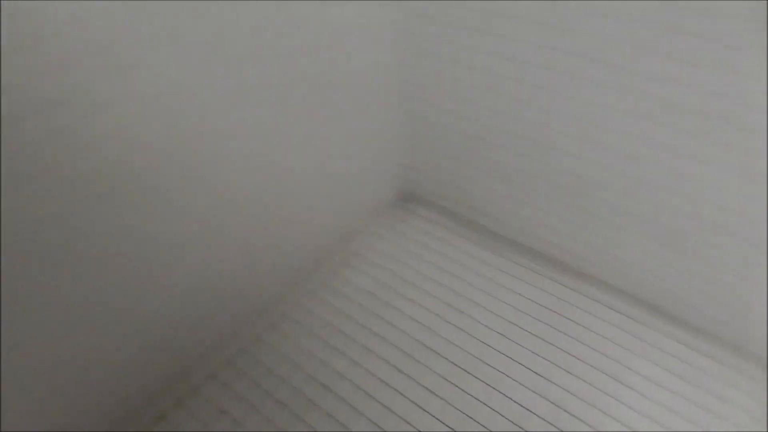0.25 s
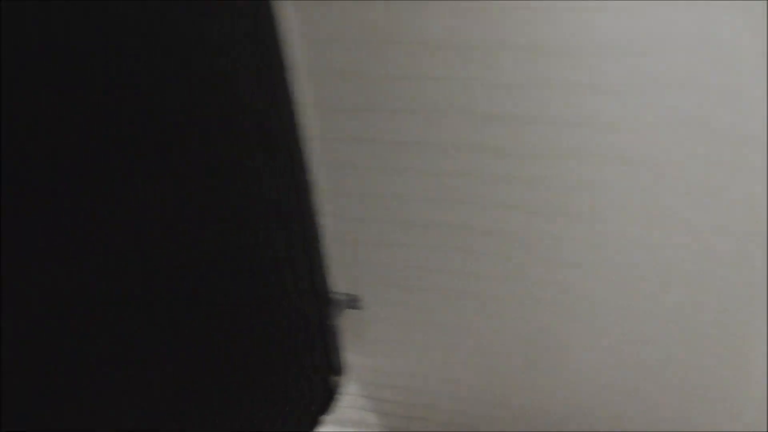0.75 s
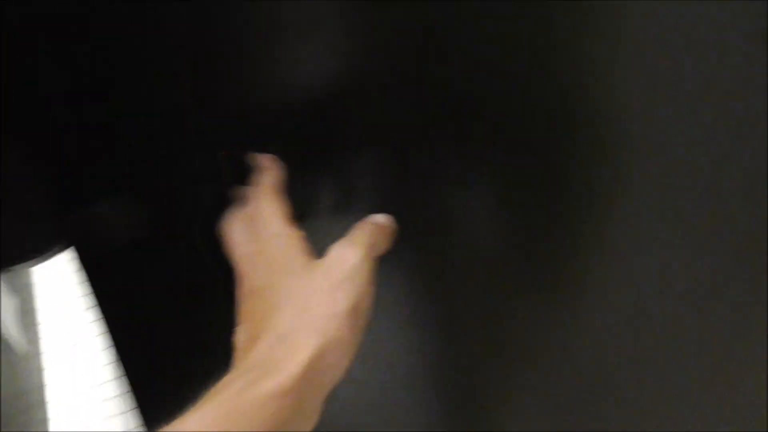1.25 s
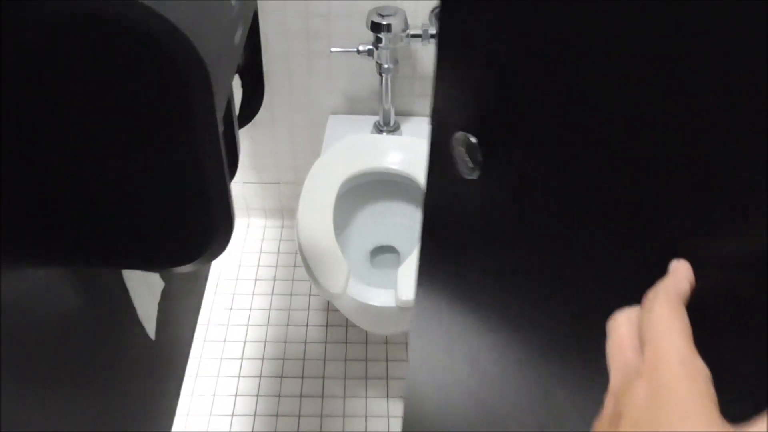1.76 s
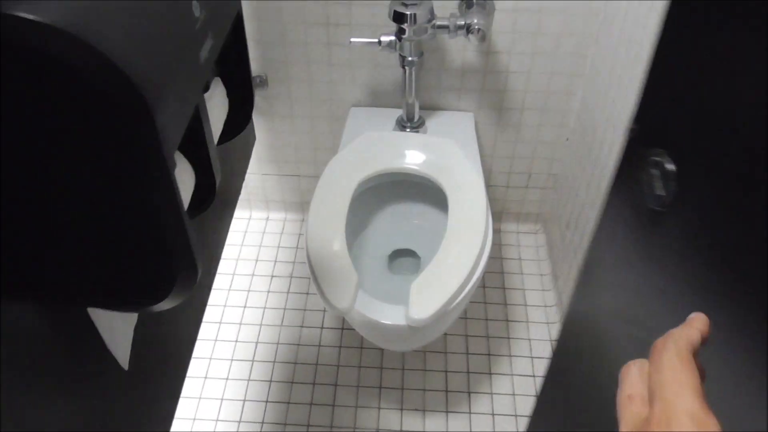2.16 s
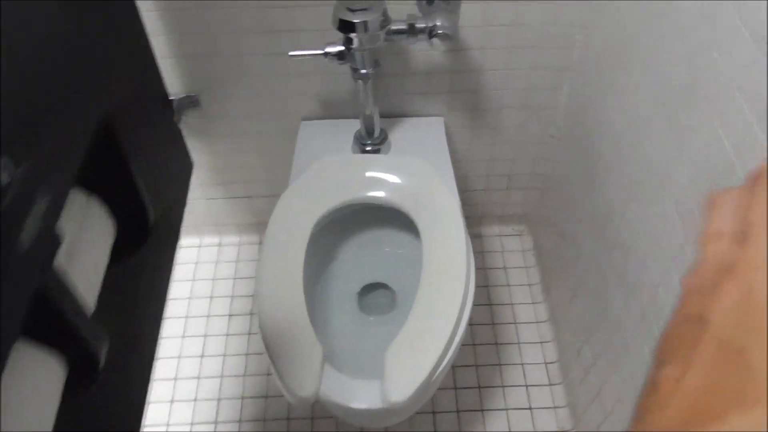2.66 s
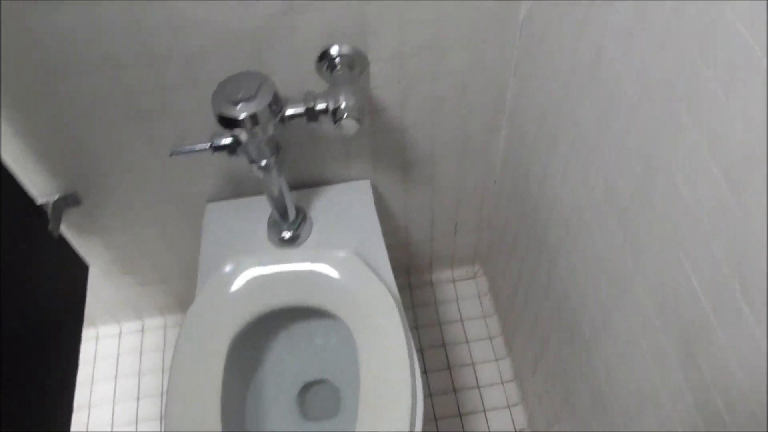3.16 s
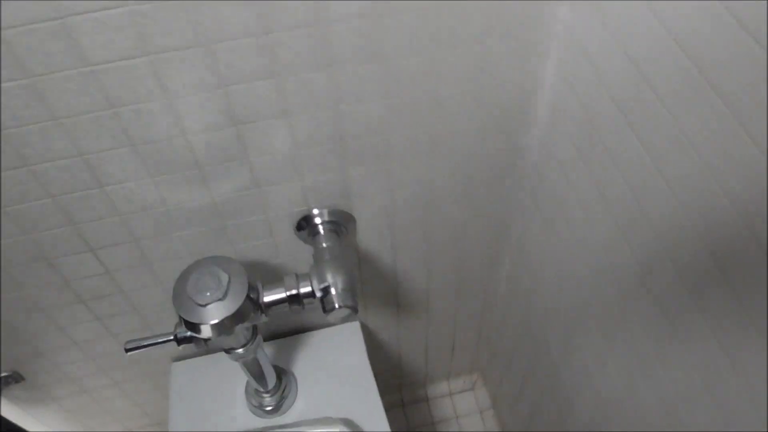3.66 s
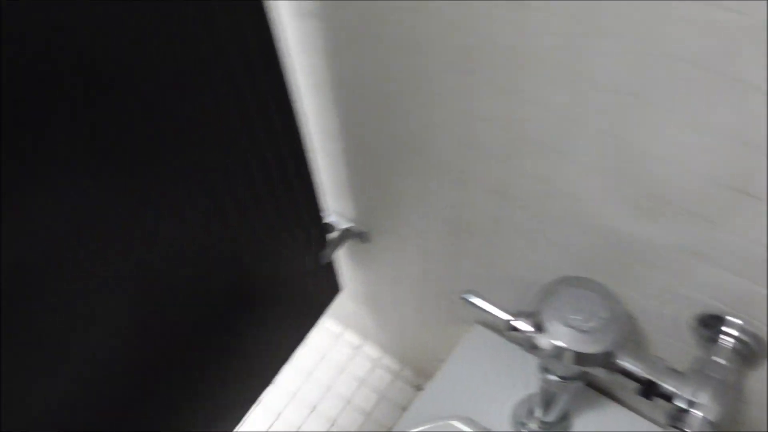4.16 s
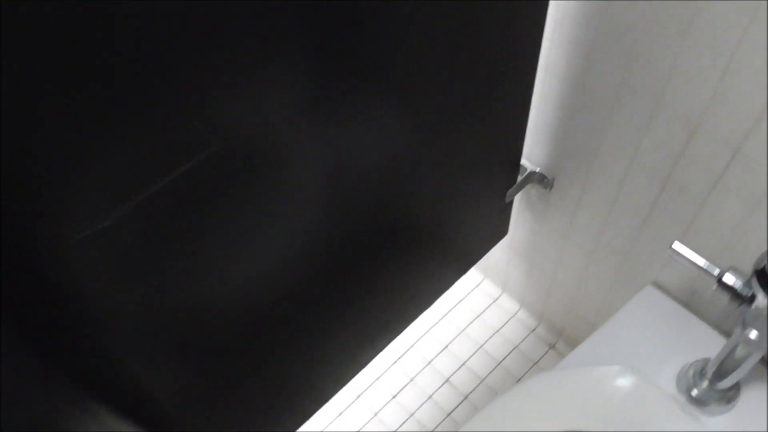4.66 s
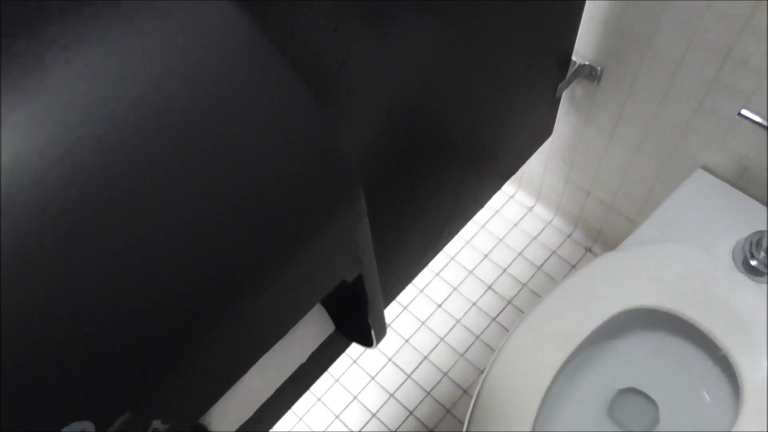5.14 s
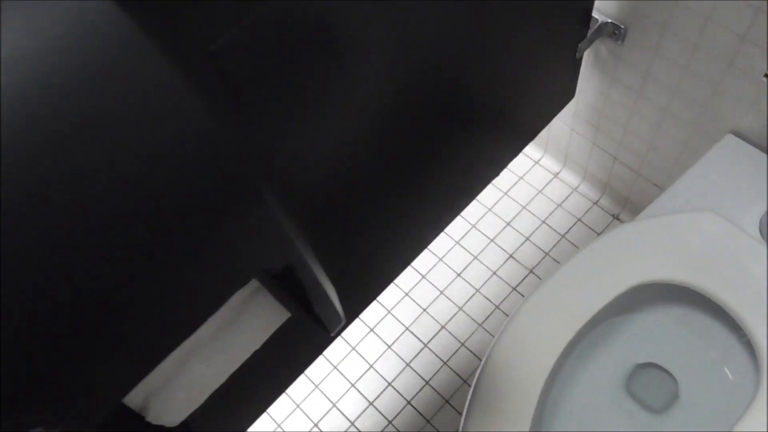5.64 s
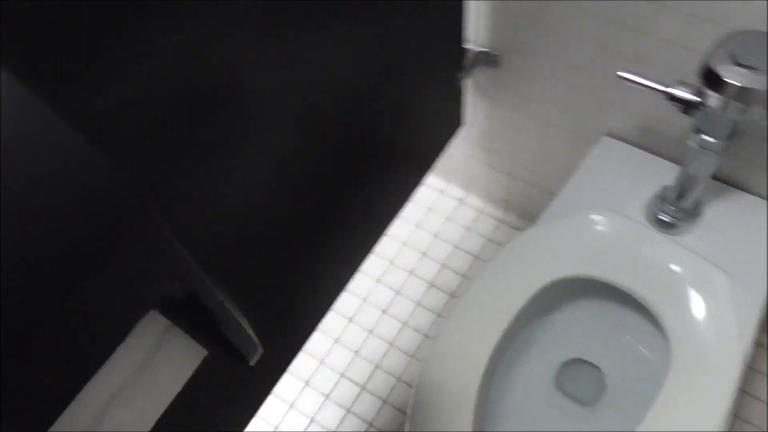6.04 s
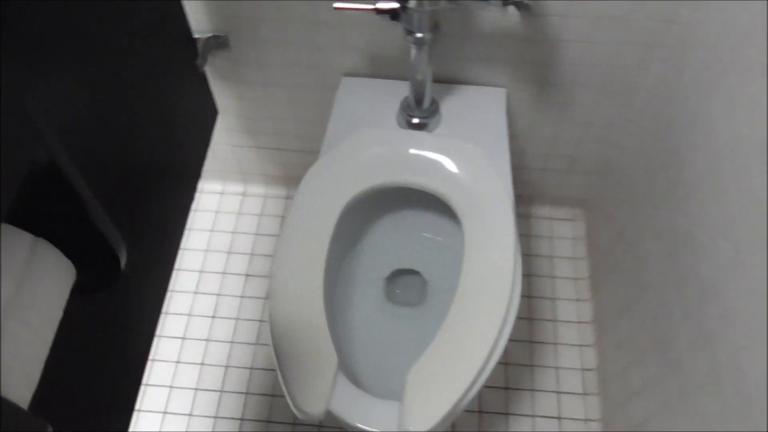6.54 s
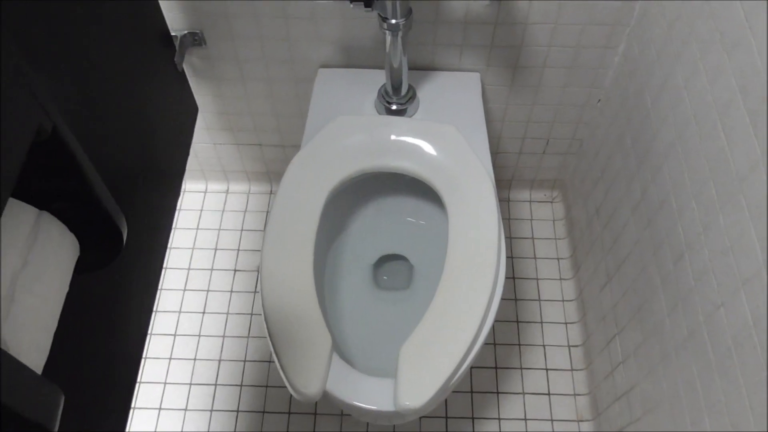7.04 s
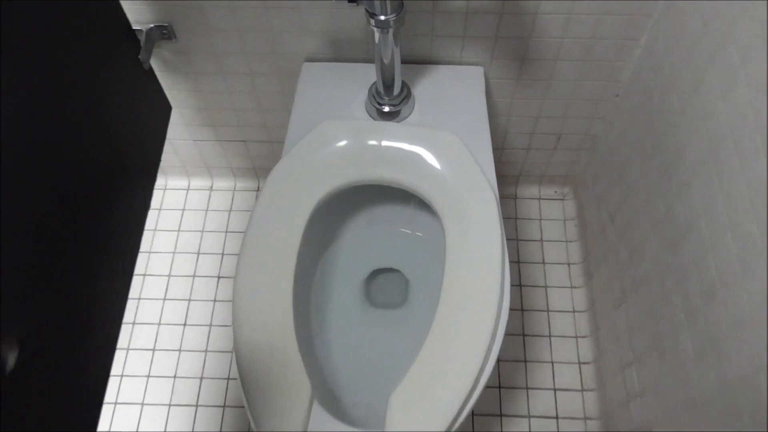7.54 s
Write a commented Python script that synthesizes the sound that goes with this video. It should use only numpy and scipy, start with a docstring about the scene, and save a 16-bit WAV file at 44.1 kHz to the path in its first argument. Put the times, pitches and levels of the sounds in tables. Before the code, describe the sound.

In a tiled restroom, shoes scuff, a stall door bangs with a ringing latch, and heavy knocks shake the partition while ventilation hums.

```python
"""A small tiled restroom stall. Someone walks in: footsteps, a hand on the door, the door banging on
the partition, knocks on hard fittings. Each blow is four bands of decaying noise plus a hollow ring.
One bang rings the metal latch; two heavy blows set the partition booming. Shoes scuff and cloth rustles
over a low ventilation hum and a faint hiss. The tiles reflect the blows and the latch."""
import sys
import numpy as np
from scipy import signal
from scipy.fft import rfft, irfft
from scipy.io import wavfile
from scipy.ndimage import uniform_filter1d

SR = 44100
rng = np.random.default_rng(int(sys.argv[2]) if len(sys.argv) > 2 else 0)


def generate_wav(signal):
    """Clip the signal to [-1, 1] and save it as 16-bit WAV at the path in sys.argv[1]."""
    frames = np.transpose(np.atleast_2d(signal))
    scaled = np.clip(frames, -1, 1) * 32767
    pcm = np.round(scaled).astype(np.int16)
    wavfile.write(sys.argv[1], SR, pcm)


N = 343980

# Stereo width. Each row: frequency in Hz, left-right correlation.
COHERENCE = [(60, 0.99), (300, 0.85), (700, 0.65), (1600, 0.42), (12000, 0.35)]
# Resonances of the stall in Hz.
STALL_MODES_HZ = (167.8, 269.2, 307.7, 376, 482.4, 583.4, 729, 857, 1069, 1244)


def gain_of(db):
    return 10 ** (np.asarray(db) / 20)


def unit_rms(x):
    return x / np.sqrt(np.mean(x ** 2) + 1e-20)


def curve_at(points, hz):
    """Interpolate (Hz, value) rows over log frequency."""
    point_hz, value = np.transpose(points)
    return np.interp(np.log(hz + 1), np.log(point_hz + 1), value)


def add(mix, start_s, sound):
    part = mix[:, round(start_s * SR):][:, :sound.shape[1]]
    part += sound[:, :part.shape[1]]


def noise(colour, patchy_db=0, flicker_db=0, size=1024):
    """Unit-RMS stereo noise; optional drifting spectral patches and wide-band flicker."""
    frames, hz = 4 * N // size + 5, np.fft.rfftfreq(size, 1 / SR)
    a, b, c, d, patches = rng.standard_normal((frames, len(hz), 5)).T
    patches = unit_rms(uniform_filter1d(uniform_filter1d(patches, size=50, axis=0), size=12, axis=1))
    flicker = unit_rms(uniform_filter1d(rng.standard_normal(frames), size=3))
    coherence = curve_at(COHERENCE, hz)[:, None]
    left, independent = a + 1j * b, c + 1j * d
    spectra = np.array([left, coherence * left + np.sqrt(1 - coherence ** 2) * independent])
    spectra *= gain_of(curve_at(colour, hz)[:, None] + patchy_db * patches + flicker_db * flicker)
    return unit_rms(signal.istft(spectra, nperseg=size, noverlap=3 * size // 4)[1][:, :N])


def hiss():
    """Faint microphone self-noise."""
    # Each row: frequency in Hz, relative level in dB.
    colour = [(600, -48), (1500, 11), (1900, -32), (6000, -19), (11000, 0), (15800, -9)]
    return gain_of(-69.5) * noise(colour, patchy_db=1.5, flicker_db=0.2)


def ventilation():
    """Air rumbles and the stall resonates with a drone; both levels drift as the listener moves."""
    # Each row: time in seconds, rumble in dB, drone in dB.
    levels = [(0, -48.5, -76), (.4, -52, -56.5), (2.4, -50.5, -59.5), (4.7, -53, -61), (6.8, -51.5, -58.5),
              (7.8, -55.5, -51)]
    # Spectra. Each row: frequency in Hz, relative level in dB.
    rumble_colour = [(25, -22.5), (60, -8.5), (110, -8), (190, -1.5), (260, -4.5), (340, -14), (515, -20),
                     (1200, -41.5)]
    drone_colour = [(120, -21.5), (160, -7.5), (205, -15.5), (258, 1.5), (300, -15), (400, -109)]
    t = np.arange(N) / SR
    times_s, rumble_db, drone_db = np.transpose(levels)
    rumble = gain_of(np.interp(t, times_s, rumble_db)) * noise(rumble_colour, size=4096)
    drone = gain_of(np.interp(t, times_s, drone_db)) * noise(drone_colour, size=4096)
    return rumble + drone


def shoes_and_cloth():
    """Each movement swells, holds and fades, scuffing the floor and rustling the cloth together."""
    # Each row: middle in seconds, hold in seconds, scuff in dB, rustle in dB.
    movements = [(0.038, 0.074, -75, -60.5), (0.628, 0.18, -53, -61.5), (0.84, 0.093, -58.5, -62.5),
                 (1.305, 0.48, -55, -58), (1.937, 0.32, -63, -64), (2.649, .26, -50, -58),
                 (3.078, 0.074, -40, -49), (3.342, 0.34, -56.5, -64.5), (3.753, 0.25, -54, -61),
                 (4.273, 0.12, -54, -59.5), (4.87, 1, -58.5, -65), (5.585, 0.22, -42, -59),
                 (5.959, 0.078, -56.5, -61.5), (6.388, 0.26, -49, -58), (6.7, 0.016, -50.5, -45)]
    # Spectra. Each row: frequency in Hz, relative level in dB.
    scuff_colour = [(250, -24), (400, 1.5), (600, -1), (1400, -11), (1900, -25.5), (3000, -96)]
    rustle_colour = [(1200, -54), (2000, 1), (3000, -5), (4000, -0.5), (6000, -5.5), (9000, 0),
                     (13000, -7.5), (15800, -19)]
    rise_db_per_s, fade_db_per_s = 242, 209
    creases_per_s, crease_s, crease_db = 14, 0.004, 1
    t = np.arange(N) / SR
    scuff_power, rustle_power = gain_of((-63.5, -69.5)) ** 2  # constant fidgeting
    for middle_s, hold_s, scuff_db, rustle_db in movements:
        drop_db = rise_db_per_s * np.maximum(middle_s - hold_s / 2 - t, 0)
        drop_db += fade_db_per_s * np.maximum(t - middle_s - hold_s / 2, 0)
        scuff_power += gain_of(scuff_db - drop_db) ** 2
        rustle_power += gain_of(rustle_db - drop_db) ** 2
    creases = 1. * (rng.random(N) < creases_per_s / SR)
    snaps = signal.lfilter([1], [1, -np.exp(-1 / (crease_s * SR))], creases)
    cloth = (1 + gain_of(crease_db) * snaps) * noise(rustle_colour, patchy_db=1, flicker_db=1)
    scuff = noise(scuff_colour, patchy_db=1, flicker_db=2.26)
    return np.sqrt(scuff_power) * scuff + np.sqrt(rustle_power) * cloth


def tiles(x):
    """Reverb: sparse reflections of random sign plus standing waves, each band at its own decay rate."""
    # Each row: frequency in Hz, T60 in seconds.
    decay = [(150, 0.68), (1000, 0.45), (2500, 0.034), (9000, 0.37), (15000, 0.42)]
    taps = np.zeros((2, SR))
    delays = np.arange(400, SR - 20, 20) + rng.integers(0, 20, (2, (SR - 401) // 20))
    np.put_along_axis(taps, delays, rng.choice([-1., 1.], delays.shape), 1)
    taps[1] = 0.84 * taps[0] + 0.5 * taps[1]
    taps += gain_of(-38) * sum(np.sin(2 * np.pi * hz * np.arange(SR) / SR) for hz in STALL_MODES_HZ)
    hz, t, spectra = signal.stft(taps, SR, nperseg=256)
    spectra *= gain_of(-60 * t / curve_at(decay, hz)[:, None])
    tail = signal.istft(spectra, SR, nperseg=256)[1]
    return signal.fftconvolve(x, tail / np.linalg.norm(tail[0]), axes=1)[:, :N]


def partition():
    """The panel booms on after a heavy blow: quick rise, sagging hold, fade."""
    # Each row: start in seconds, level in dB, hold in seconds.
    shudders = [(1.223, -40.5, .02), (5.239, -35.5, 0.53)]
    # Each row: frequency in Hz, relative level in dB.
    boom_colour = [(35, -45), (62, 3), (82, -31), (102, 4.5), (150, -80)]
    rise_s, sag_db_per_s, fade_db_per_s = 0.014, 11.5, 141
    envelope = np.zeros(N)
    for start_s, db, hold_s in shudders:
        t = np.maximum(np.arange(N) / SR - start_s, 0)
        fall_db = sag_db_per_s * t + fade_db_per_s * np.maximum(t - hold_s, 0)
        envelope += np.minimum(t / rise_s, 1) * gain_of(db - fall_db)
    return envelope * noise(boom_colour, size=4096)


def latch():
    """Thin metal modes set off by the door bang."""
    # Each row: frequency in Hz, level in dB.
    modes = [(8180, -37), (8265, -37), (7707, -44)]
    start_s, t60_s = 2.9, 0.45
    out, t = np.zeros((2, N)), np.arange(SR // 2) / SR
    for hz, db in modes:
        cycles = hz * t + rng.random((2, 1)) / 4
        add(out, start_s, gain_of(db - 60 * t / t60_s) * np.sin(2 * np.pi * cycles))
    return out


def blow_spectrum(hz, hardness_db):
    """Stereo noise spectrum of one blow: hard ticks are brighter and ring small metal parts."""
    # Each row: frequency in Hz, relative level in dB.
    colour = [(70, -25), (160, -4), (500, -2.5), (1300, -12), (2600, -21), (4200, -21), (6000, -31),
              (9000, -32.5), (12500, -41), (15500, -48)]
    metal_hz, metal_width_hz = 10500, 890
    mode_db, mode_width_hz = 3.5, 41
    db = curve_at(colour, hz) + 0.54 * hardness_db * np.log2(np.clip(hz, 2300, 13000) / 9000)
    db += 1.86 * unit_rms(uniform_filter1d(rng.standard_normal(len(hz)), size=60))  # each spot's colour
    db += 0.54 * np.clip(hardness_db, 0, 20) * np.exp(-((hz - metal_hz) / metal_width_hz) ** 2)
    db += mode_db * sum(np.exp(-((hz - f) / mode_width_hz) ** 2) for f in STALL_MODES_HZ)
    left, independent = rfft(rng.standard_normal((2, 2 * (len(hz) - 1))))
    coherence = curve_at(COHERENCE, hz)
    return gain_of(db) * np.array([left, coherence * left + np.sqrt(1 - coherence ** 2) * independent])


def hollow_ring(t, hz, t60_s):
    """A struck mode and its overtone; the first cycles swing wider."""
    cycles = hz * t
    tone = np.sin(2 * np.pi * cycles) + 0.2 * np.sin(2 * np.pi * 1.9 * cycles)
    onset = (1 - np.exp(-2 * cycles)) * (1 + 0.57 * np.exp(-cycles / 2.3))
    return tone * onset * gain_of(-60 * t / t60_s)


def blow(levels_db, hollow_hz, decay_s):
    """One impact with its near reflections: a hollow ring, then per band a click and decaying noise."""
    # Bands thud, body, clack, snap: edges in Hz, rise times in seconds, T60 as multiples of decay_s.
    edges_hz = (130, 400, 1500, 7000, 15500)
    rises_s = (0.0085, 0.00072, 0.0023, 0.00086)
    t60_ratios = (1.3, 1.29, 2.52, 2.29)
    ring_offset_db, click_offset_db, noise_offset_db = -2.05, -6.5, -5.5
    size = 16384
    t, hz = np.arange(size) / SR, np.fft.rfftfreq(size, 1 / SR)
    spectrum = blow_spectrum(hz, hardness_db=levels_db[3] - levels_db[2])
    ring_db = levels_db[np.searchsorted(edges_hz, hollow_hz) - 1] + ring_offset_db
    out = gain_of(ring_db) * hollow_ring(t, hollow_hz, 0.8 * decay_s) * np.ones((2, 1))
    direct_boost = 1 + 0.46 * np.exp(-t / 0.0045)
    for k, db in enumerate(levels_db):
        low_hz, high_hz = edges_hz[k:k + 2]
        bandpass = signal.butter(3, (low_hz, high_hz), "band", fs=SR, output="sos")
        click = signal.sosfilt(bandpass, 1. * (t == 0))  # first contact
        out += gain_of(db + click_offset_db) * click / click.max()
        band = 1 / np.hypot(1, (low_hz / (hz + 1)) ** 4) / np.hypot(1, (hz / high_hz) ** 4)
        envelope = (1 - np.exp(-t / rises_s[k])) * direct_boost
        envelope *= gain_of(db + noise_offset_db - 60 * t / (decay_s * t60_ratios[k]))
        out += unit_rms(irfft(spectrum * band, size) * envelope) * np.sqrt(np.mean(envelope ** 2))
    return out


def steps_and_knocks():
    """Feet, hand and door strike the floor, partition and fittings."""
    # Each row: start in seconds, base levels of thud, body, clack and snap in dB,
    # hollow pitch in Hz, base decay time in seconds.
    impacts = [(0, -34, -43, -67, -56, 162.7, 0.15), (.557, -37, -44.5, -47.5, -58, 568, 0.12),
               (.592, -54, -41, -49.5, -45.5, 522, 0.1), (.632, -25, -32, -52.5, -49, 335, 0.14),
               (1.137, -29, -33.5, -40.5, -54, 390, 0.12), (1.157, -23, -33, -56, -48, 211, 0.12),
               (1.193, -47, -54, -49, -36, 304, 0.033), (1.218, -16, -18.5, -28, -24, 216, 0.15),
               (1.406, -62, -40, -41.5, -45, 1252, 0.078), (1.758, -33, -36, -53, -36.5, 544, 0.14),
               (2.589, -61, -38, -79, -61, 768, 0.12), (2.642, -32.5, -33.5, -54, -53, 734, 0.098),
               (2.892, -16.5, -12.5, -25, -23, 432, 0.16), (2.921, -18, -13.5, -33, -27, 259, 0.16),
               (3.128, -27.5, -45, -79, -47.5, 176, 0.1), (3.55, -30, -39, -58, -43, 530, 0.21),
               (3.576, -21, -29.5, -42, -53, 315.6, 0.15), (4.068, -31, -35.5, -54.5, -52, 513, 0.17),
               (4.164, -30.5, -46, -63, -57, 217, 0.092), (4.753, -27.5, -37, -51, -70, 2150, 0.12),
               (4.822, -36, -42.5, -62, -72, 572, 0.17), (4.948, -44.5, -39, -62, -57, 333, 0.33),
               (5.107, -42.5, -45, -58, -57, 887, 0.23), (5.154, -50, -31, -53, -50, 523, 0.1),
               (5.193, -56, -33.5, -47.5, -46, 489, 0.36), (5.247, -13, -8.5, -27.5, -21.5, 235, 0.18),
               (5.343, -17, -21.5, -44, -35, 294, 0.15), (5.501, -19.5, -16.5, -36.5, -33, 262, 0.13),
               (5.547, -18, -32, -53, -54, 292, 0.071), (5.64, -31, -28, -49, -48.5, 342, 0.16),
               (5.682, -33, -28, -66, -68, 518, 0.19), (5.768, -32, -20.5, -38.5, -47.5, 270, 0.1),
               (5.997, -47, -36.5, -41, -45, 545, 0.15), (6.019, -37, -20, -37, -35.5, 655, 0.12),
               (6.155, -45, -31, -48.5, -40, 597, 0.15), (6.183, -25, -27, -48, -64, 500, 0.14),
               (6.307, -28, -33.5, -47, -78, 278, 0.15), (7.426, -40.5, -48.5, -67, -65, 870, 0.06)]
    out = np.zeros((2, N))
    for start_s, *levels_db, hollow_hz, decay_s in impacts:
        add(out, start_s, blow(levels_db, hollow_hz, decay_s))
    return out


def scene():
    blows = latch() + steps_and_knocks()
    background = ventilation() + hiss()
    return background + blows + gain_of(-11) * tiles(blows) + partition() + shoes_and_cloth()


def record(dry):
    """Steep low-pass."""
    cutoff_hz = 15750
    lowpass = signal.firwin(511, cutoff_hz, window=("kaiser", 9), fs=SR)
    return signal.oaconvolve(dry, lowpass[None], "same")


dry = scene()
out = record(dry)
generate_wav(out)
```